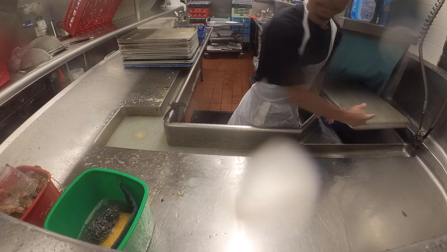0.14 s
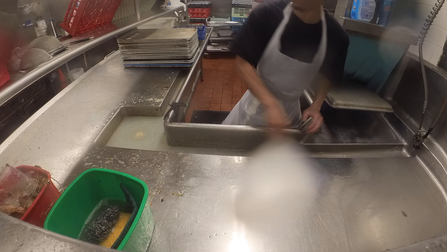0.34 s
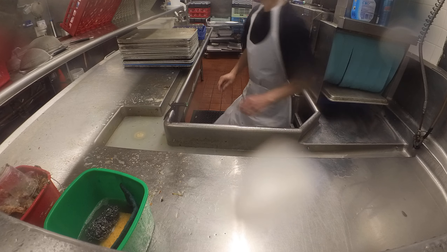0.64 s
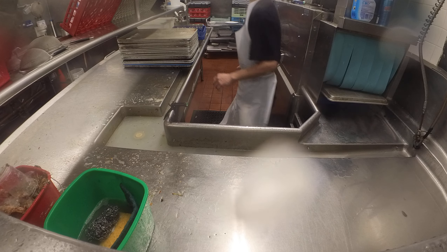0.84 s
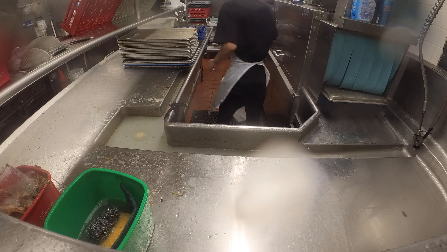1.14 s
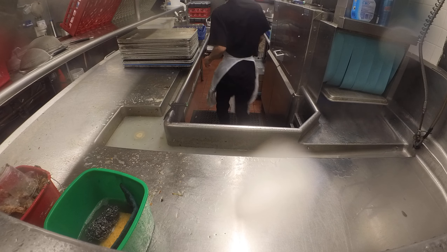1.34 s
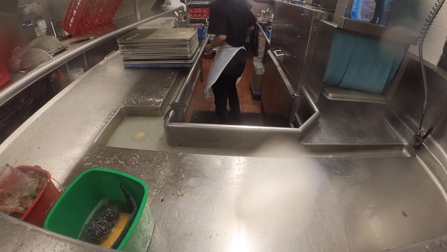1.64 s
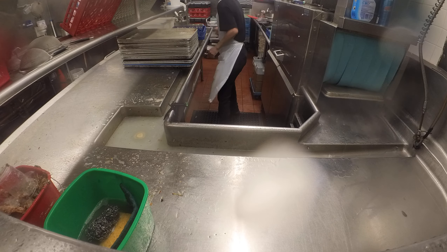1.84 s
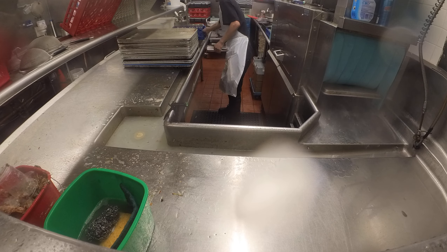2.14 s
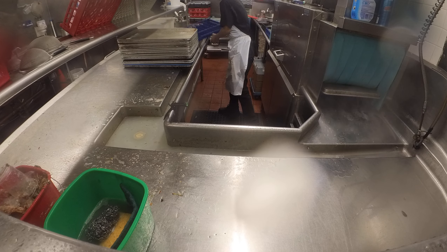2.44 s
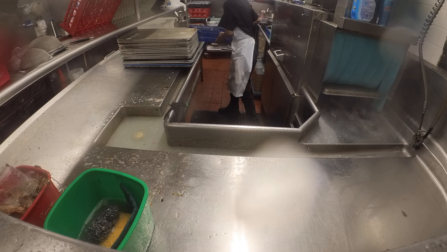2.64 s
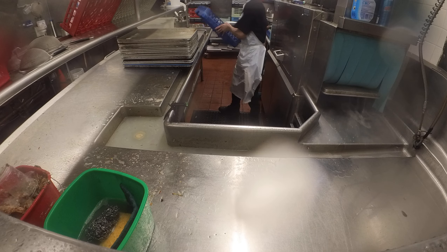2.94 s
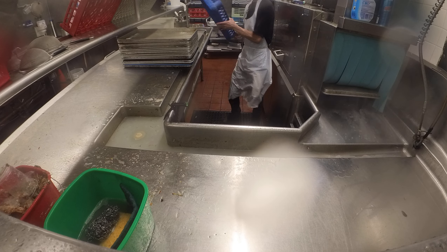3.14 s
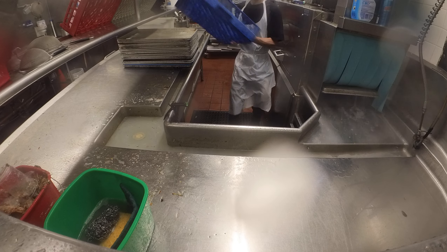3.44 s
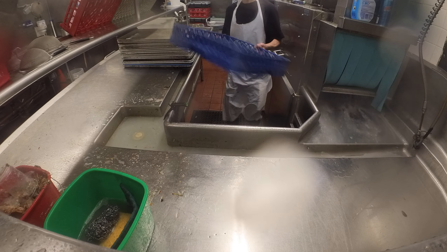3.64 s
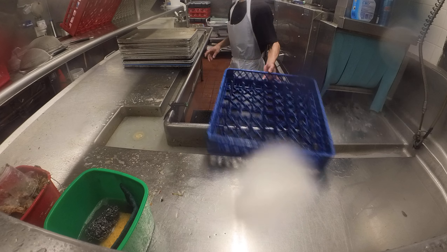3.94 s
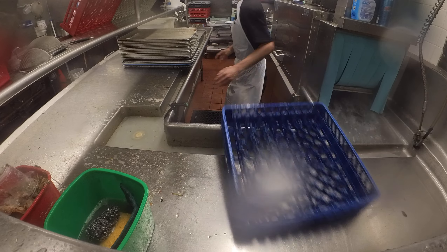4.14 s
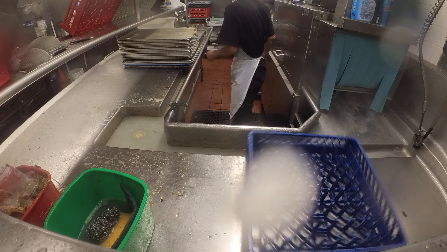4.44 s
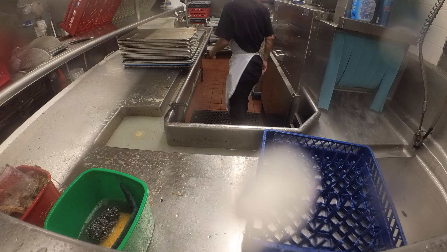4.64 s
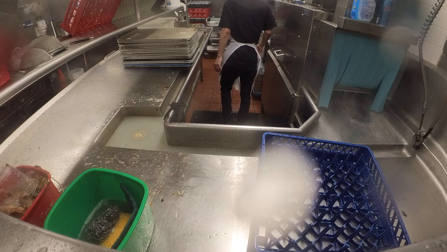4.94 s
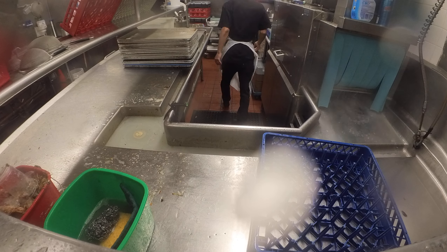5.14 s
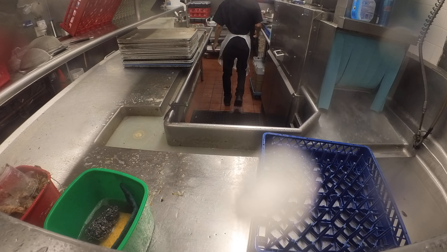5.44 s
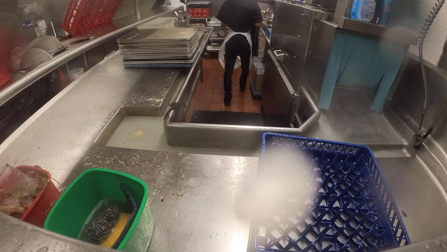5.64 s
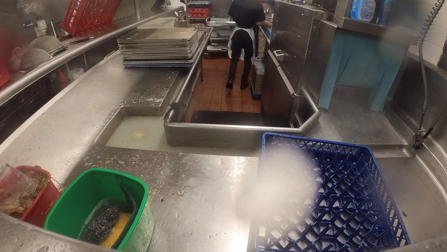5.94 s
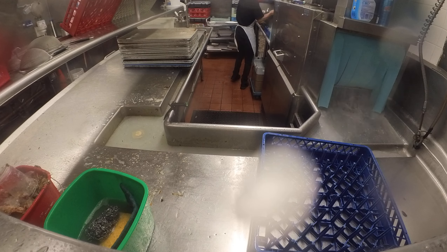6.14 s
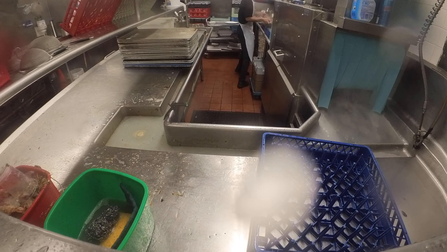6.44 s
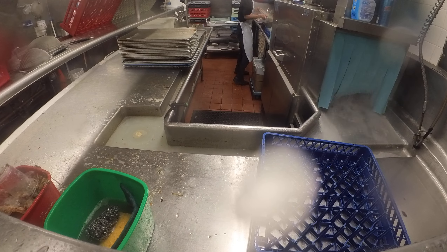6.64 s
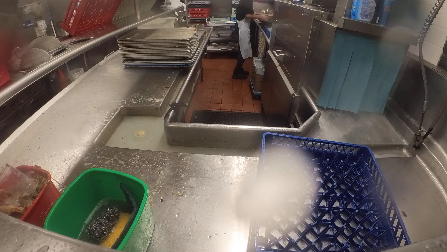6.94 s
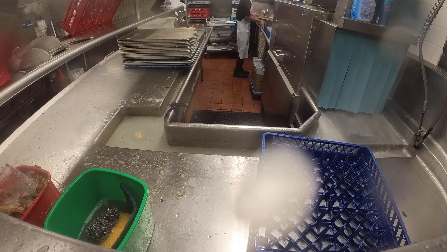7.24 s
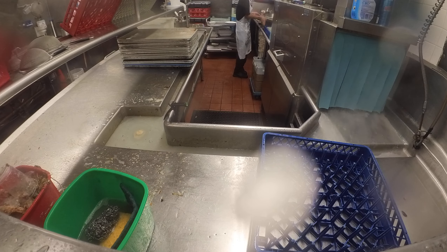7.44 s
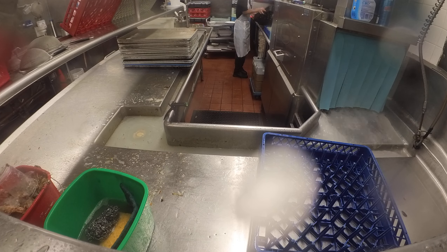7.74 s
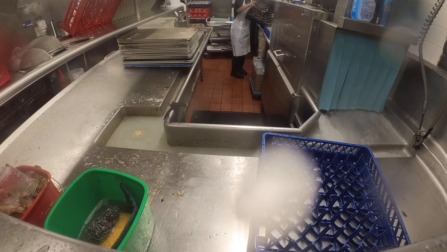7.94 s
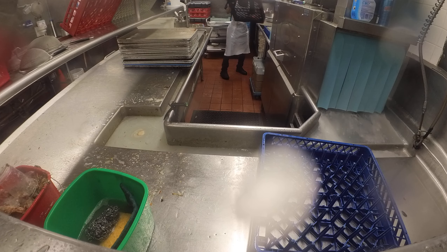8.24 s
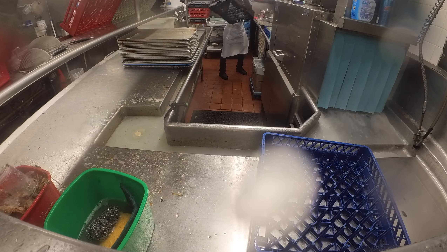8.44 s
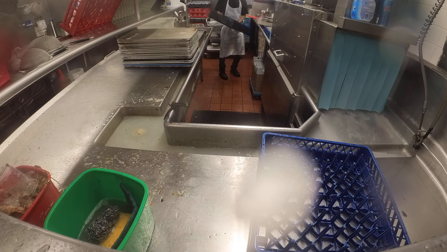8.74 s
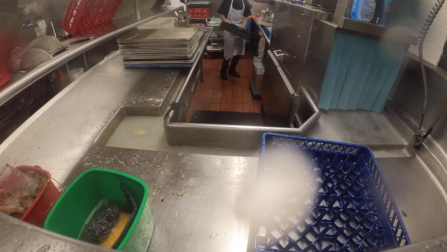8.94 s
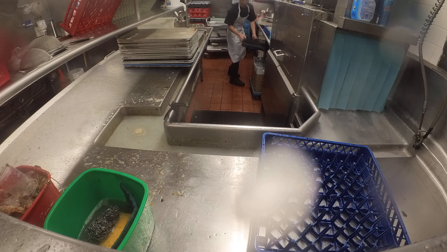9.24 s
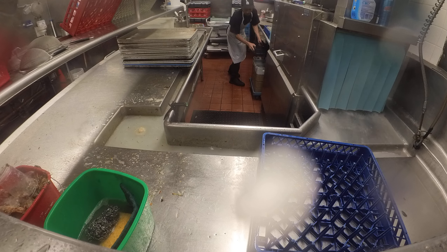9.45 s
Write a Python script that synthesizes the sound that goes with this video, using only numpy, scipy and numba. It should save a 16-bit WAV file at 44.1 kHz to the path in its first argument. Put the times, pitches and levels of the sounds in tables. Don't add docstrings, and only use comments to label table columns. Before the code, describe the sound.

Inside a tiled dish room, a conveyor dish machine sprays and hums without pause. A tray clatters and scrapes close by at the start, then duller slides and single knocks follow. A rack lands in a hard burst of bangs around four seconds, and scattered knocks continue to the end. The microphone sits on the steel table in a sealed case, so all is muffled and boxy, with a nasal midrange.

```python
import sys
import numpy as np
from scipy import signal
from scipy.fft import rfft, irfft
from scipy.io import wavfile
from scipy.ndimage import uniform_filter1d, minimum_filter1d
from numba import njit

SR = 44100
rng = np.random.default_rng(int(sys.argv[2]) if len(sys.argv) > 2 else 0)


def to_wav(s):
    ch = np.atleast_2d(s).T
    pcm = np.round(np.clip(ch, -1, 1) * 32767)
    wavfile.write(sys.argv[1], SR, pcm.astype(np.int16))


def linear_from_db(decibels):
    return 10 ** (np.asarray(decibels, float) / 20)


N = 422919
HZ = np.fft.rfftfreq(N, 1 / SR) + 1e-3
T = np.arange(N) / SR

# (time [s], depth [dB], fall [s], hold [s])
SAGS = [(0, 5.5, 0.011, 0.069), (.09, 14, 0.013, 0.044), (.25, 8, 0.084, 0.14), (2.25, 3.5, 0.064, 0.18),
        (2.62, 7.5, 0.037, 0.2), (3.5, 2, .1, 0.13), (3.96, 6.5, .01, 0.089), (4.1, 7.5, 0.045, 0.26),
        (4.46, 12.5, 0.049, .04), (4.6, 12, 0.18, 0.096), (5.42, 1, 0.049, 0.053), (6.4, 3, 0.095, 0.23),
        (6.8, 5, 0.11, 0.13), (7.25, 7.5, 0.26, 0.062), (7.75, 6.5, 0.051, 0.22), (8.07, 9, 0.22, 0.15),
        (8.9, 0.5, 0.14, 0.041), (9.3, -1.5, 0.079, .1)]
SAG_RELEASE_S = 0.32
# (time [s], length [s], low boom level [dB], high boom level [dB],
# tank slosh level [dB])
SLIDES = [(0, 0.4, -24, -50, -42), (0.108, 0.051, -13.5, -35.5, -24), (0.468, 0.2, -29, -28.5, -18.5),
          (.7, 0.19, -20.5, -43, -46), (1.442, 0.32, -19.5, -27.5, -34), (2.366, 0.34, -21, -39, -23),
          (3.19, 0.56, -18.5, -24, -17), (3.95, 0.154, -17, -36, -32), (4.133, 0.22, -16, -15.5, -16),
          (4.48, 0.424, -19.5, -21.5, -31.5), (4.53, 0.16, -23.5, -24.5, -20),
          (2.655, 0.081, -26, -25, -19.5), (5.2, 0.23, -41.5, -26, -22), (5.645, 0.47, -24.5, -26.5, -21.5),
          (6.086, 0.3, -18.5, -23.5, -19.5), (6.517, 0.069, -25, -27, -15), (6.952, 0.23, -27, -22.5, -17),
          (7.441, 0.12, -32.5, -39.5, -24), (7.69, 0.33, -25.5, -33.5, -19.5),
          (8.739, 0.46, -23.5, -23, -21.5)]


def band(lo_hz, hi_hz, colour=0.99, order=4):
    highpass = 1 + (lo_hz / HZ) ** (2 * order)
    lowpass = 1 + (HZ / hi_hz) ** (2 * order)
    response = colour / np.sqrt(highpass * lowpass)
    return irfft(rfft(rng.standard_normal(N)) * response, N)


def walk(rate):
    k = int(SR / rate)
    steps = np.repeat(rng.standard_normal(N // 200 + 1), k)[:N]
    smooth = uniform_filter1d(uniform_filter1d(steps, k), k)
    return smooth / smooth.std()


@njit
def ring(x, hz, width):
    y, b, l = np.empty(len(x)), 0., 0.
    for i in range(len(x)):
        g, k = np.tan(np.pi * hz[i] / SR), width / hz[i]
        v = (b + g * (x[i] - l)) / (1 + g * (g + k))
        b, l, y[i] = 2 * v - b, l + 2 * g * v, k * v
    return y


def hold(s, length, attack, release):
    rise = (T - s) / attack
    fall = 1 + (s + attack + length - T) / release
    return np.clip(np.minimum(rise, fall), 0, 1)


def dips(events, release):
    return -np.max([db * hold(s, held, fall, release) for s, db, fall, held in events], axis=0)


def swollen(steady_db, events, axis):
    attack_s, release_s = 0.13, 0.19
    extra = 0
    for row in events:
        swell = hold(row[0] - attack_s, row[1], attack_s, release_s)
        extra = extra + (linear_from_db(row[axis]) * swell) ** 2
    return 10 * np.log10(linear_from_db(steady_db) ** 2 + extra)


def table():
    # (frequency [Hz], level re hum [dB])
    motor = [(58.3, -2), (119.5, -8.5), (173.4, -10.5), (139.4, -4.5), (216.3, -11), (291.4, -7.5),
             (159.3, -5), (80, -12), (822, -13), (648, -12), (955, -14.5), (69.6, -11), (1954, -15)]
    # (time [s], depth [dB], fall [s], hold [s])
    low_drops = [
        (4.44, 8, .04, .04),
        (6.5, -2.5, .08, 0.068),
        (7.2, 4.5, 0.074, 0.12),
        (7.88, 11, 0.033, 0.35),
    ]
    # (time [s], length [s], level [dB])
    shakes = [
        (0, 0.081, -22),
        (0.345, 0.17, -27.5),
        (1.198, 0.28, -30),
        (3.858, 0.2, -30.5),
        (4.212, 0.16, -23),
        (4.618, 0.17, -27),
        (8.9, 0.36, -34),
        (9.406, 0.22, -25.5),
    ]
    low_boom_db, high_boom_db, hum_db = -27.5, -25.5, -28.5
    sag_share = 0.45
    quiet_db = sag_share * dips(SAGS, SAG_RELEASE_S) + dips(low_drops, 0.22)
    low_db = swollen(low_boom_db + quiet_db, SLIDES, axis=2)
    high_db = swollen(high_boom_db + quiet_db, SLIDES, axis=3)
    hum_db = swollen(hum_db + quiet_db, shakes, axis=2)

    shake = band(76, 190)
    low = ring(shake, 120 + 3 * walk(4), 13.)
    high = ring(shake, 168 + 9 * walk(3), 28.)
    booms = linear_from_db(low_db + 4.0) * low / low.std() + linear_from_db(high_db + 5.5) * high / high.std()

    tones = np.zeros(N)
    for hz, db in motor:
        cycles = hz * T + 0.09 * walk(12)
        tones += np.sqrt(2) * linear_from_db(db + 1.4 * walk(7)) * np.sin(2 * np.pi * cycles)
    rumble = band(34, 82, order=3)
    return booms + linear_from_db(hum_db + 5.0) * (tones + 0.81 * rumble / rumble.std())


def washer():
    # (frequency [Hz], width [Hz], gain [dB])
    tank = [(242, 13, -5), (255, 65, 5), (351, 3.7, 9), (464, 26, 5.5), (523, 48, 4), (576.4, 22, 5.5),
            (640, 40, 6), (692, 15, -4), (843, 15, 5), (888, 47, -6), (908, 12, 6), (980, 120, 2.5),
            (1040, 30, -2), (1227, 64, 2), (1379, 23, 3.5), (1426, 15, 1), (1410, 11, 1), (1510, 12, 2),
            (1568, 23, 2), (1280, 25, 2), (1798, 30, 3.5)]
    # (time [s], length [s], drumming level [dB], mist level [dB])
    splashes = [(0.111, 0.086, -16, -60.5), (0.567, 0.3, -16.5, -41.5), (1.367, 0.27, -12, -46.5),
                (3.235, 0.037, -9.5, -41.5), (3.464, 0.17, -15.5, -49.5), (3.83, 0.13, -14, -39),
                (5.222, 0.088, -21, -45), (5.831, 0.53, -35, -46), (7.923, 0.12, -13, -46.5),
                (9.207, 0.082, -15.5, -48.5), (7.558, .1, -30, -70), (0.995, 0.17, -14.5, -42.5)]
    spray_db, slosh_db, mist_db = -12.5, -16.5, -41.5
    spray_share, slosh_share = 0.79, 0.79
    sag_db = dips(SAGS, SAG_RELEASE_S)
    spray_db = swollen(spray_db + spray_share * sag_db, splashes, axis=2)
    mist_db = swollen(mist_db + sag_db, splashes, axis=3)
    slosh_db = swollen(slosh_db + slosh_share * sag_db, SLIDES, axis=4)

    modes = 1 + sum((linear_from_db(db) - 1) / (1 + (2 * (HZ - hz) / width) ** 2) for hz, width, db in tank)
    surge = walk(9)
    slosh = linear_from_db(slosh_db + 17.0 + 0.62 * walk(14)) * band(235, 920, modes)
    jets = linear_from_db(spray_db + 15.5 + 1.3 * surge) * band(926, 1900, modes)
    whistle = linear_from_db(spray_db + 24.0) * ring(rng.standard_normal(N), 1475 + 25 * walk(3), 22.)
    mist = linear_from_db(mist_db + 44.5 + 0.25 * surge + 1.1 * walk(11)) * band(1900, 12000)
    return slosh + jets + whistle + mist


def rings():
    # (time [s], level [dB], frequency [Hz], decay t60 [s])
    ringing_ware = [(4.6, -18.5, 980, 0.3), (4.7, -27.5, 210, 1.3), (3.4, -23, 170, 0.33),
                    (2.669, -20, 322, 0.37), (2.9, -24.5, 410, 0.6), (3.8, -26.5, 77, 0.68),
                    (4.1, -27, 120, 0.52), (3.9815, -11, 111, 0.42), (3.987, -19, 59, 0.82),
                    (8.8, -22, 89.8, 0.26), (6.868, -15, 86, 0.18), (5.2, -17, 350, 0.3),
                    (10, -19, 320, 0.24), (8.03, -20, 485, 0.32), (6.01, -16.5, 650, .15),
                    (7.8, -18.5, 140, .3), (8.02, -29, 73, 0.68), (6.36, -16.5, 76, 0.42),
                    (7.8, -23.5, 140, 0.6), (4.588, -5, 4800, .06), (0.41, -18, 125, .35),
                    (4.2, -18.5, 460, 0.19), (4.47, -21.5, 300, 0.19), (3.962, -10, 1700, 0.17),
                    (3.9, -16.5, 200, 0.33)]
    out = np.zeros(N)
    for s, db, hz, t60 in ringing_ware:
        t = np.maximum(T - s, 0)
        swell = 1 - np.exp(-t / 0.0087)
        fade = linear_from_db(db + 11.5 - 60 * t / t60 + 3.2 * walk(40))
        waver = .2 * (hz / 400) ** .5 * walk(26)
        out += fade * swell * np.sin(2 * np.pi * (hz * t + waver))
    return out


def scrapes():
    # (time [s], length [s], start frequency [Hz], end frequency [Hz], level [dB])
    dragged_trays = [(0.411, .09, 299, 353, -20), (0.417, .07, 440, 454, -19.5),
                     (0.444, .14, 563, 594, -25.5), (0.527, 0.037, 470, 487, -20), (.53, .1, 325, 359, -19),
                     (0.582, 0.037, 640, 661, -16.5), (0.632, .06, 793, 810, -21.5),
                     (.38, .1, 130, 110, -21), (4.26, 0.051, 190, 172, -13),
                     (2.366, 0.34, 111.9, 121, -19.5), (6.92, .22, 82, 80, -17.5),
                     (7.76, 0.11, 354, 351.4, -18.5), (8.07, .22, 692, 678, -21),
                     (8.082, .12, 942, 930, -21), (8.08, 0.093, 425, 438, -24.5),
                     (6.91, .12, 163.6, 152, -23.5), (4.069, .03, 980, 960, -20),
                     (4.14, .05, 400, 360, -20.5), (4.198, 0.0304, 700, 650, -22),
                     (4.278, 0.027, 331, 300, -18.5), (4.47, .03, 747, 702, -20.5),
                     (6.53, .07, 339, 345, -19.5), (6.53, .07, 590, 600, -19.5)]
    edge_s, judder_db = .014, 3.0
    out = np.zeros(N)
    for s, length, from_hz, to_hz, db in dragged_trays:
        hz = np.interp(T, [s, s + length], [from_hz, to_hz])
        cycles = np.cumsum(hz) / SR + .15 * (to_hz / 400) ** .5 * walk(30)
        judder = linear_from_db(db + 4.5 + judder_db * walk(60))
        out += judder * hold(s, length, edge_s, edge_s) * np.sin(2 * np.pi * cycles)
    return out


def ducking():
    # (time [s], duck depth [dB])
    hard_knocks = [(.024, 9), (.078, 6), (.107, 4), (.660, 5), (2.644, 5), (3.966, 4), (4.063, 16),
                   (4.120, 10), (4.274, 13), (4.440, 4), (4.471, 7), (4.551, 6), (4.681, 7), (6.093, 13),
                   (6.405, 6), (7.142, 12), (7.209, 5), (7.865, 5)]
    ahead_s, recovery_s = .014, .007
    db = np.zeros(N)
    for s, duck_db in hard_knocks:
        fall = np.clip(1 + (T - s) / ahead_s, 0, 1) ** .6
        db -= duck_db * fall * np.exp(-np.maximum(T - s, 0) / recovery_s)
    return linear_from_db(db)


def clacks():
    # (time [s], level [dB], length [s])
    wet_trays = [(0.019, 7, 0.023), (0.074, -4, 0.016), (0.206, 0, 0.19), (0.504, 9.5, 0.042),
                 (0.598, 12.5, 0.06), (0.664, 9.5, 0.066), (0.745, 2.5, 0.013), (4.052, -8, 0.012),
                 (4.137, -0.5, 0.018), (4.481, -8.5, 0.017), (4.582, 2, 0.018), (4.663, -1.5, 0.021),
                 (6.563, 1.5, 0.037), (7.139, 10.5, 0.022), (4.052, 3, .008), (1.844, 2, .015),
                 (2.517, 0.5, .015), (5.211, 2, 0.012), (5.853, 7, .015), (6.123, 1, .015),
                 (1.297, 3.5, 0.018), (3.837, -2.5, 0.013), (9.109, 1.5, .015), (7.289, -2.5, 0.02),
                 (7.864, 2, 0.034), (8.044, 10, 0.017)]
    shape = sum(linear_from_db(db) * (T > s) * np.exp(-((T - s) / length) ** 2) for s, db, length in wet_trays)
    hiss = band(2600, 12000, colour=(HZ / 4500) ** 0.35, order=2)
    return uniform_filter1d(shape, size=40) * hiss


def knocks():
    # (time [s], peak level [dB], ring frequency [Hz], click level re peak [dB], decay t60 [s])
    blows = [(0.024, -3, 1360, -41, 0.22), (0.079, -3, 1240, -47, 0.22), (0.107, -5, 1400, -52, 0.15),
             (0.12, -5, 1450, -52, 0.15), (0.136, -6, 1420, -52, 0.15), (0.23, -6, 1500, -48, 0.15),
             (0.956, -6, 1450, -52, 0.15), (1.575, -5, 1450, -52, 0.15), (3.083, -7, 1450, -52, 0.15),
             (7.864, -5, 1450, -48, 0.15), (2.644, -4, 1490, -52, 0.22), (3.966, -4, 1480, -46, 0.22),
             (4.0635, -3.5, 1250, -47, 0.22), (4.12, -6, 1440, -44, 0.22), (4.135, -4, 1410, -45, 0.22),
             (4.274, -4, 1460, -49, 0.22), (4.44, -5, 1400, -47, 0.22), (4.471, -3, 1310, -46, 0.22),
             (4.552, -5.5, 1420, -49, 0.22), (4.59, -5, 1390, -41, 0.22), (4.681, -1, 1390, -45, 0.22),
             (6.093, -3, 1480, -46, 0.1), (6.405, -3, 977, -44, 0.22), (7.1425, -2.5, 1150, -40, 0.22),
             (4.34, -6, 1450, -50, 0.15), (7.209, -6, 1400, -50, 0.15)]
    ping_db, ping_rise_s, ping_t60_s = 5, .0008, .05
    out, t = np.zeros(N + SR), np.arange(SR // 2) / SR
    for s, db, hz, click_db, t60 in blows:
        thud, hiss = rng.standard_normal((2, len(t)))
        thud[0] = 6.
        fade = linear_from_db(-60 * t / max(t60, .02))
        body = 3.0 * ring(thud, hz + 0 * t, 410.0) + 3.6 * ring(thud, 520 + 0 * t, 700.)
        bright = ring(hiss, 5000 + 0 * t, 9000.0) + 0.92 * ring(hiss, 2500 + 0 * t, 1200.)
        click = linear_from_db(click_db + 48.5) * bright * np.sqrt(fade)
        ping_fade = linear_from_db(ping_db - 60 * t / ping_t60_s) * (1 - np.exp(-t / ping_rise_s))
        ping = ping_fade * np.sin(2 * np.pi * hz * t)
        at = int((s - .0005) * SR)
        out[at:at + len(t)] += linear_from_db(db - 2.5) * (fade * (body + click) + ping)
    return out[:N]


def scene():
    steady = washer() + table() + rings() + scrapes()
    return (steady * ducking() + knocks() + clacks())[None]


def case_filter(x):
    # (frequency [Hz], level [dB])
    case = [(15, -22), (45, -5), (250, -7.5), (1080, -3.5), (1300, -0.5), (1490, -3), (1620, -4.5),
            (1850, -13), (2600, -26), (3800, -45.5), (4400, -51), (4850, -46), (6000, -59), (8300, -75),
            (10000, -97)]
    hz, db = np.transpose(case)
    grid_hz = np.fft.rfftfreq(8192, 1 / SR) + 1e-3
    cepstrum = irfft(np.log(linear_from_db(np.interp(np.log(grid_hz), np.log(hz), db))))
    cepstrum[1:4096] *= 2
    cepstrum[4097:] = 0
    impulse = irfft(np.exp(rfft(cepstrum)))
    return irfft(rfft(x) * rfft(impulse, N), N)


@njit
def recover(gain, step):
    y, g = np.empty(len(gain)), 1.
    for i in range(len(gain)):
        g = min(gain[i], g + (1 - g) * step)
        y[i] = g
    return y


def limiter(x):
    ceiling, ahead_s, release_s = 0.78, 0.013, .06
    ahead = int(ahead_s * SR)
    needed = np.minimum(1, ceiling / (np.abs(x) + 1e-9))
    room = minimum_filter1d(needed, ahead, origin=-(ahead // 2) + 1)
    gain = uniform_filter1d(recover(room, 1 / (release_s * SR)), ahead, origin=ahead // 2 - 1)
    return x * gain


def top_cut(x):
    return signal.sosfilt(signal.butter(12, 8270, fs=SR, output="sos"), x)


def record(dry):
    mix = limiter(case_filter(dry[0]))[None]
    return top_cut(mix)


dry = scene()
out = record(dry)
to_wav(out)
```